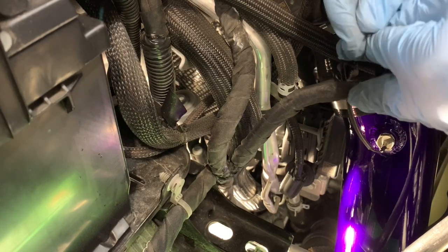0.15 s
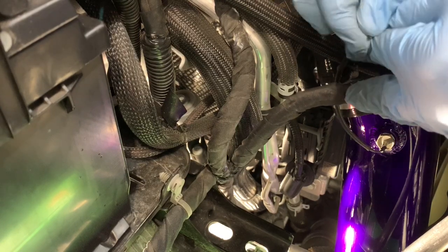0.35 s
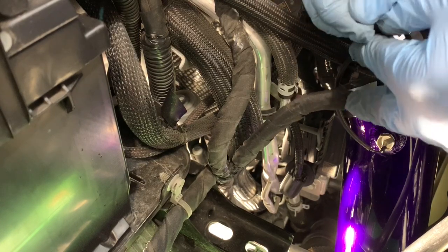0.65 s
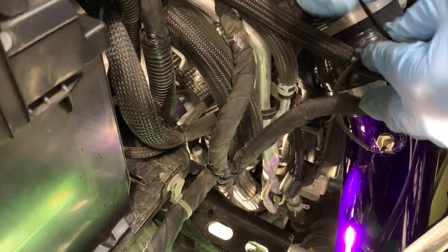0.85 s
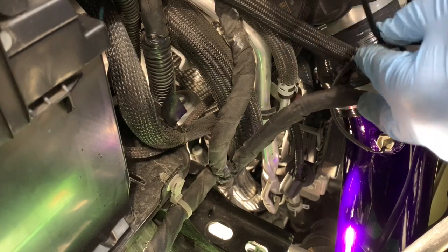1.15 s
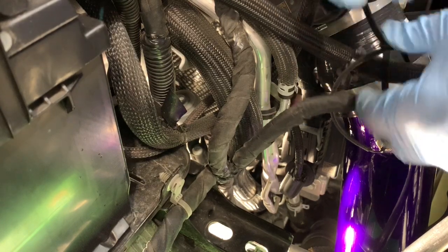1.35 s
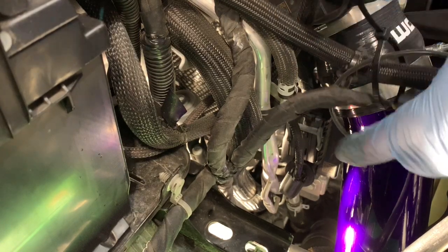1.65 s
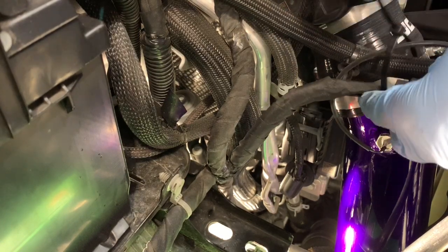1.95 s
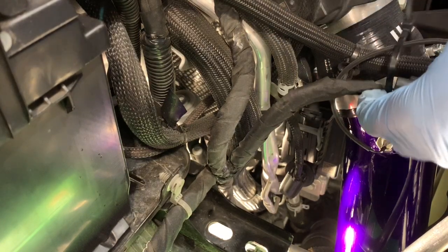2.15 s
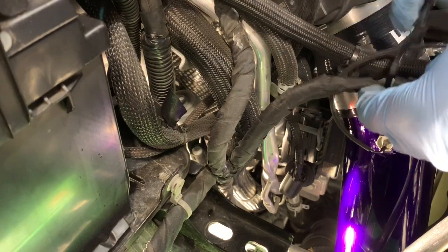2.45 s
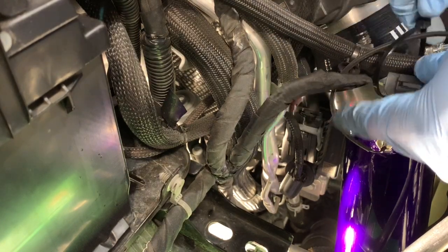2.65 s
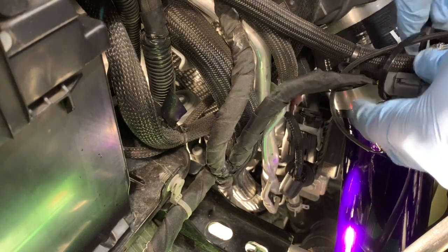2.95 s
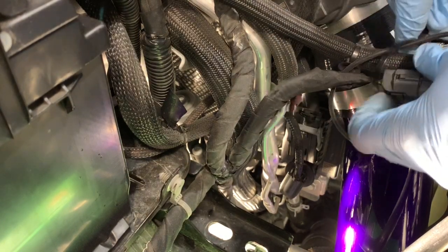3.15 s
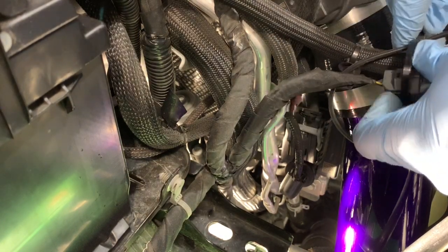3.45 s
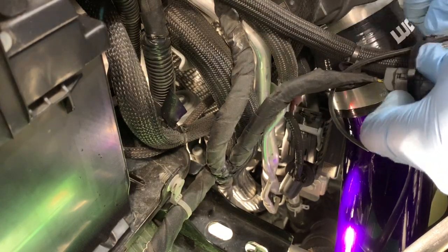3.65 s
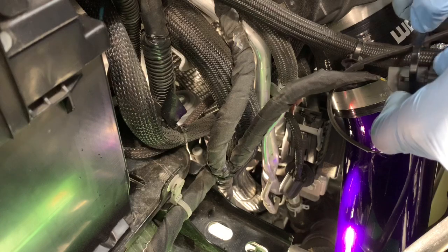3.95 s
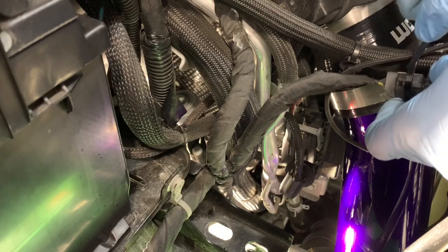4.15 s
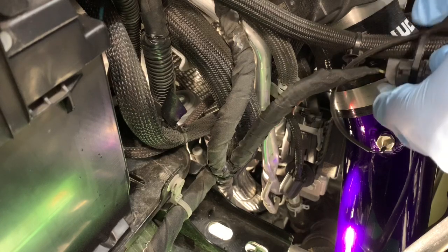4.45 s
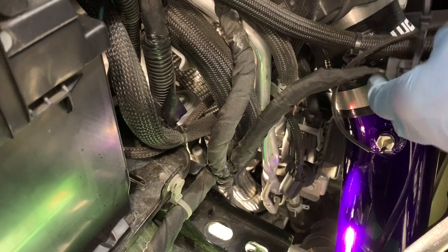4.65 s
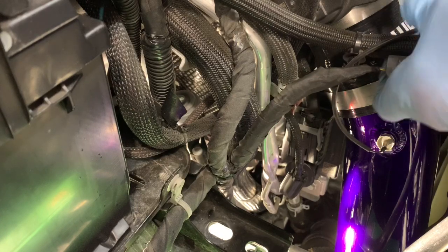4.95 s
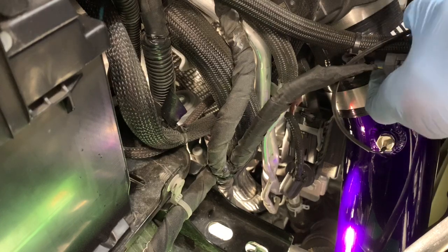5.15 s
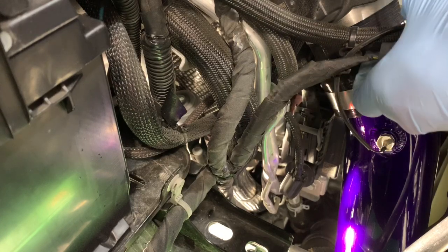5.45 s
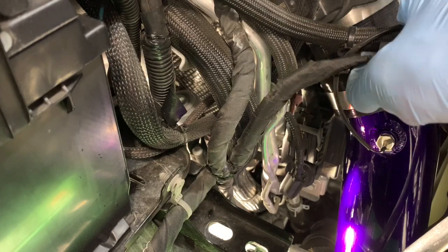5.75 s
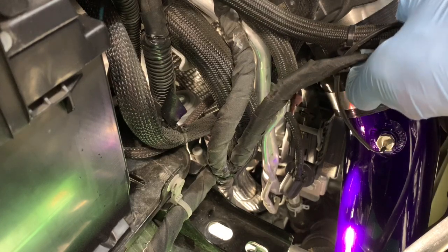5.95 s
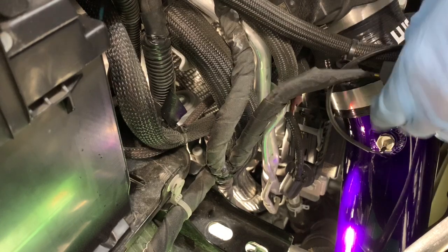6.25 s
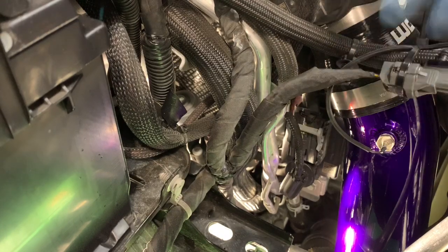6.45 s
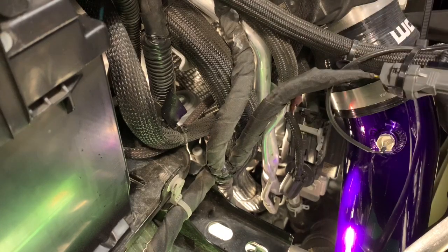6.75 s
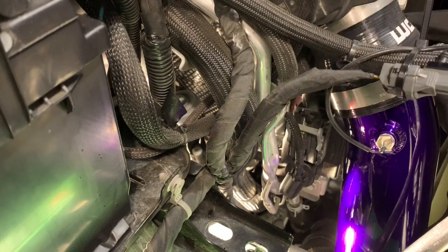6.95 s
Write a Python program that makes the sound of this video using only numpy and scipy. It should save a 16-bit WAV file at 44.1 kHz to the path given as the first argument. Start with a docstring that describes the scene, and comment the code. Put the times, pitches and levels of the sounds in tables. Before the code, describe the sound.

Gloved hands rub and tap around a wiring loom while a plastic tie zips tight in crisp bursts, a distant motor humming low.

```python
"""Cable tie in an engine bay

In a garage, a nylon cable tie is pulled tight round a wiring loom: each tooth snaps past the pawl as a
bouncing click that rings head, strap and loom and leaves a smeared echo. Gloved hands rustle on braid (noise),
tap plastic (short noise) and knock a hollow housing (decaying modes); a motor hums far off (sines and rumble).
Heard close by in stereo; the treble is nearly one sound on both sides, the left delayed and phase-shifted."""
import sys
import numpy as np
from scipy import signal
from scipy.fft import rfft, irfft
from scipy.io import wavfile

SR = 44100
rng = np.random.default_rng(int(sys.argv[2]) if len(sys.argv) > 2 else 0)


def unload_wav(signal):
    """Save mono or channel-first audio to the path in sys.argv[1] as 16-bit WAV at rate SR, clipped to [-1, 1]."""
    wavfile.write(
        sys.argv[1],
        SR,
        np.round(np.clip(np.atleast_2d(signal).T, -1, 1) * 32767).astype(np.int16),
    )


N = 313551   # samples, about 7.1 s

# Far motor, turning about 25 times a second. Each row: start in seconds, level in dB of multiples 2, 3, 4 and 5
# of the turning rate, level in dB of the rumble's 130-240 Hz part.
MOTOR_LEVELS = [(0.0, -58, -56, -58, -62, -65), (0.12, -70, -55, -52, -68, -64),
                (0.44, -54.5, -56.5, -52.5, -53.5, -58), (0.97, -54.5, -58, -54.5, -62.5, -68),
                (1.15, -65, -66, -69, -55.5, -67.5), (1.25, -53, -53.5, -61, -54, -66),
                (1.46, -81, -54.5, -51, -64, -64.5), (1.66, -58, -57, -49.5, -55, -56),
                (1.72, -59, -72, -57, -58, -65), (2.2, -52, -56, -51, -54, -63.5),
                (2.97, -61, -60, -72, -69, -64), (3.64, -57, -61, -52.5, -55, -67),
                (4.1, -55, -53, -53, -70, -62), (4.65, -53.5, -67, -58, -56, -64),
                (5.29, -54.5, -54, -54.5, -59.5, -66), (6.54, -54.5, -83, -48.5, -53.5, -59),
                (6.97, -53.5, -67, -47, -58.5, -58.5), (7.11, -80, -47, -47.5, -53, -67)]
# A second, slowly falling drone. Each row: time in seconds, level in dB.
DRONE_LEVELS = [(0, -87), (.42, -56), (.85, -61.5), (1.35, -66), (2.24, -60), (4.45, -73), (5.54, -61.5),
                (7.11, -86)]
# Spectrum of the far rumble. Each row: frequency in Hz, relative density in dB per Hz.
RUMBLE_SPECTRUM = [(30, -54), (39, -16.5), (47, -8), (60, 9), (68, -6), (113, 0.5), (188, -6.5),
                   (260, -16.5), (700, -51), (1500, -55.5), (4000, -89.5)]
# Spectrum of the still garage air. Each row: frequency in Hz, relative density in dB per Hz.
AIR_SPECTRUM = [(600, -20), (1200, 5), (2500, -2), (5000, -7), (8500, -11), (12000, -14), (15800, -16),
                (16300, -40)]
# How alike left and right are in the diffuse field. Each row: frequency in Hz, likeness from 0 to 1.
LIKENESS = [(40, 0.3), (70, 0.97), (130, 1), (290, 0.33), (640, 0.065), (1400, 0.44)]
# Loom and hoses shifting under the hands. Each row: time in seconds, level in dB before a 3 dB lift.
SHUFFLE_LEVELS = [(0, -70), (.2, -66), (.6, -65), (1.05, -67), (1.72, -69), (2.45, -66), (2.95, -72),
                  (3.65, -67), (3.96, -70), (4.2, -62), (4.6, -69), (4.93, -64), (5.47, -66), (5.92, -74),
                  (6.12, -66), (6.67, -65), (6.9, -69), (7.11, -73)]
# Spectrum of loom and hoses. Each row: frequency in Hz, relative density in dB per Hz.
HOSE_SPECTRUM = [(180, -7), (260, 0.6), (370, 2), (500, -2.5), (750, -5), (1000, -8), (1400, -28),
                 (4000, -50)]
# Strokes of glove and sleeve on braid. Each row: peak in seconds, swell in seconds, fade in seconds,
# bright hiss in dB, dull rub in dB, both before a 3 dB lift; swell and fade are at least 5 ms in use.
BRAID_STROKES = [(.136, 0.12, 0.11, -65.5, -69), (.35, 0.12, 0.14, -66.5, -62.5),
                 (.426, 0.076, .06, -71, -72), (.52, 0.17, 0.25, -66, -69),
                 (0.722, 0.0052, 0.7, -70, -61.5), (.895, 0.14, 0.058, -60.5, -85.5),
                 (1.169, 0.16, 0.036, -68, -79), (1.31, 0.33, 1, -59, -67.5),
                 (1.445, 0.006, 0.023, -44.5, -61), (1.587, 0.0077, 0.035, -55, -59),
                 (1.755, 0.024, 0.075, -63, -62), (1.898, 0.035, 0.061, -54.5, -61),
                 (2.07, 0.056, .03, -62.5, -63.5), (2.141, 0.08, 0.0047, -51.5, -62),
                 (2.18, 0.059, 0.076, -59, -61), (2.345, 0.028, 0.25, -52, -63),
                 (2.409, 0.016, 0.12, -53, -66), (2.44, 0.17, 0.11, -76, -61.5),
                 (2.52, 0.12, 0.092, -89, -67.5), (2.605, 0.28, 0.047, -57, -66),
                 (2.696, 0.24, 0.41, -71, -67.5), (2.994, 0.016, 0.12, -63.5, -71),
                 (3.078, 0.082, 0.051, -57.5, -67), (3.111, 0.03, 0.15, -64.5, -67),
                 (3.177, 0.014, 0.025, -50.5, -60.5), (3.353, .012, 0.19, -68.5, -74.5),
                 (3.496, 0.022, 0.45, -57, -75), (3.562, 0.066, 0.51, -84, -68.5),
                 (3.633, 0.03, 0.017, -48, -64), (3.94, 0.42, 0.15, -73.5, -68),
                 (4.053, 0.017, 0.46, -63.5, -62.5), (4.33, 0.062, 0.064, -60, -72),
                 (4.364, 0.054, 1, -72, -68.5), (4.643, 0.063, 0.075, -51.5, -59.5),
                 (4.756, 0.1, 0.043, -55.5, -64.5), (4.849, 0.11, 0.26, -61.5, -65.5),
                 (4.99, 0.15, 0.059, -63, -62), (5.108, 0.17, 0.16, -72, -61.5),
                 (5.258, 0.019, 0.19, -61, -55.5), (5.45, 0.17, 0.58, -74, -72),
                 (5.701, 0.12, 0.3, -78, -87.5), (5.87, .1, 0.12, -72.5, -86),
                 (6.098, 0.038, 0.19, -63, -62)]
# The hands slide off. Each row: the same columns as the strokes on braid.
LETTING_GO = [(6.16, .06, .35, -60, -61), (6.38, .18, .2, -64, -63)]
# Spectrum of bright hiss. Each row: frequency in Hz, relative density in dB per Hz.
HISS_SPECTRUM = [(3000, -21.5), (5500, -4), (7000, -7), (8800, -1.5), (11000, -2.5), (13000, -4),
                 (15700, -2.5), (16300, -35)]
# Spectrum of dull rubbing. Each row: frequency in Hz, relative density in dB per Hz.
RUB_SPECTRUM = [(500, -40.5), (1000, -5), (1600, -10.5), (2500, -5.5), (4000, -4.5), (5500, -8.5),
                (6800, -7), (9000, -44.5)]
# Knuckle knocks on a hollow housing. Each row: time in seconds, drive level in dB, hardness in dB per octave,
# share of the free ring time.
KNUCKLE_KNOCKS = [(.322, -41.5, 18, 0.14), (2.466, -44, 6, 0.99), (5.289, -40, -1, 0.85),
                  (5.3092, -36, 5, 0.72), (5.311, -31.5, 4.5, 1), (5.314, -40.5, 8, 1), (5.319, -39, 3, 1),
                  (6.0932, -41.5, 9, 0.21), (6.0972, -35, 2.5, 0.24), (6.102, -55, 9, 0.25)]
# Modes of the housing. Each row: frequency in Hz, level in dB before scatter, free 60 dB decay in seconds.
HOUSING_MODES = [(240, -0.5, 0.058), (374, -3, 0.052), (514, 3.5, 0.038), (806, 3.5, 0.014), (970, -5, .02),
                 (1252, -6, 0.056), (1730, -14.5, 0.017), (2070, -12, 0.012), (2590, -11, 0.008),
                 (3190, -13.5, 0.01), (3570, -16, 0.0045)]
# Fingers and strap tapping on plastic. Each row: time in seconds, bright part in dB and low part in dB before
# the gains of the two parts, 60 dB decay in seconds before its limits.
PLASTIC_TAPS = [(0.2926, -44, -68, 0.028), (0.3207, -31.5, -37.5, 0.052), (0.367, -57, -50.5, 0.038),
                (1.44, -44, -49, 0.0063), (2.18, -34, -70, 0.015), (2.408, -23.5, -56, 0.0086),
                (2.4655, -20.5, -68, 0.035), (6.0833, -39.5, -52, 0.015)]
# Teeth that snap one by one. Each row: time in seconds, drive level in dB before the resonances.
SINGLE_TEETH = [(0.7349, -8.5), (0.7487, -2.5), (0.7529, -6.5), (0.8656, -24), (0.8712, -14),
                (0.8797, -13.5), (1.1519, -11.5), (4.0554, -4.5), (4.0724, -5.5), (4.0949, -2.5),
                (4.1362, -3), (4.1652, -2.5), (4.1772, -1.5), (4.1886, -8.5), (4.1999, 0.5), (4.2112, -11),
                (4.2245, 0), (4.2326, -4.5), (4.2427, -6), (4.2528, -5), (4.261, -7), (4.2728, -5.5),
                (4.2842, -7), (4.3019, -6.5), (5.0982, -14.5), (5.3028, -14), (5.3347, -18), (5.3681, -19),
                (5.4204, -21), (5.456, -20), (5.4948, -20.5), (5.511, -37), (5.5474, -19), (5.664, -22.5),
                (5.753, -23), (5.8617, -22)]
# Even draws of the strap, one list each. Each row: time in seconds, teeth passed, drive level in dB.
EVEN_DRAWS = [
    [(.7822, 0, -9), (.7911, 4, -10), (.7987, 7, -12.5), (.814, 13, -11), (.8212, 16, -10), (.83, 20, -11),
     (.8387, 24, -10.5), (.8471, 28, -10), (.8539, 31, -11.5), (.8589, 33, -13), (.862, 34, -15)],
    [(.9628, 0, -11), (.9726, 1, -10.5), (.9833, 2, -10.5), (.991, 3, -10), (.9982, 4, -10.5),
     (1.0089, 6, -12), (1.0174, 8, -12.5), (1.0297, 10, -13.5), (1.0466, 13, -11.5), (1.0769, 18, -11.5),
     (1.0839, 19, -11.5), (1.1024, 21, -13), (1.1263, 23, -14)],
    [(5.2533, 0, -14), (5.2655, 2, -15), (5.2745, 4, -13), (5.2803, 5, -15.5), (5.2878, 6, -17)],
]
# The pawl lands and rebounds. Each row: delay in seconds, level in dB.
PAWL_BOUNCES = [(.0001, 0), (.0004, -8), (.001, -11)]
# Settings of the tie from each start on; a row may begin a new pull or change the colour partway through one.
# Each row: start in seconds, head in Hz, head in dB, pawl tip in dB, shank in dB, # strap in Hz, strap width in
# Hz, strap in dB, loose end in Hz, loose end in dB, loom in dB, # loom tilt in dB per octave. Levels are before
# the scatter from tooth to tooth.
STRAP_PULLS = [(0.699, 14900, 17.5, 5.5, 2, 7370, 1820, 9.5, 3465, -17, -26, -1),
               (0.931, 14300, 12.5, 14.5, 6.5, 7760, 1290, 10, 4140, -42, -21.5, 5),
               (4.0, 14830, 9.5, 4.5, 13, 9140, 1440, 6.5, 6010, -9.5, -22, 3.5),
               (4.247, 15100, 8.5, 6, 15.5, 9300, 1440, 2.5, 2060, -16, -20.5, 0),
               (5.048, 14600, 17.5, 9, -3, 9000, 1500, 9, 6630, 3, -16.5, 1),
               (5.331, 14600, 7.5, 12, 2, 8660, 1450, 22.5, 6590, 6, -15, 2.5)]
# Resonances of the loom under the tie. Each row: frequency in Hz, width in Hz, relative level in dB.
LOOM_MODES = [(5100, 330, 8), (3710, 740, 8.5), (2590, 160, 14), (1850, 250, 8.5), (1310, 300, 9.5),
              (800, 890, 2.5), (6020, 1500, 2.5), (3240, 250, 4), (4450, 570, 2)]

MOTOR_HZ, RUMBLE_LIFT_DB, AIR_DB = 24.71, 10.5, -79   # the lift: whole rumble over its 130-240 Hz part
DRONE_HZ, DRONE_SAG_HZ_PER_S = 196, 2.6
STROKE_RANGE_DB = 20   # level lost over one swell or fade time
# narrow bands added to the rub, whose levels drift by chance
PATCH_WIDTH_HZ, PATCH_DB, PATCH_SWING_DB, PATCH_RATE_HZ = 200, 1, 5, 4
KNOCK_RIGHT_LOSS_DB, MODE_SCATTER_DB = 6, 1.5
TOOTH_JITTER_S, TOOTH_SCATTER_DB = .00006, .8
HEAD_WIDTH_HZ, SHANK_HZ, SHANK_WIDTH_HZ = 2360, 13100, 1900
TIP_HZ, TIP_WIDTH_HZ, LOOSE_WIDTH_HZ = 15600, 260, 550
SEAT_LOOM_DB, SEAT_STRAP_DB = 3, .8   # each tooth seats its own way: scatter of the resonances
ECHO_LENGTH = 4000   # samples
ECHO_DB, ECHO_T60_S, TAIL_DB, TAIL_T60_S = -28, .038, -16, .06   # the tail is relative to the echo
NEAR_WALL_S, FAR_WALL_S, FAR_WALL_LIFT = .001, .0033, .4
LAST_WALL_S, OPEN_LOSS_DB = .0045, -7   # past the last near surface the echo drops
FRESH = .3   # share of the echo that is new each time
LOOM_SNAP, LOOM_SMEAR = 1.4, 4.22   # how much the loom takes of the snap and of its echo
LOOM_LAG = 9   # samples by which the left side hears the snap in the loom later
CAPSULE_HZ, CUTOFF_HZ = 15780, 17119   # the microphone falls off above the first, the top is cut at the second
SHARED_TREBLE_HZ, LEFT_LAG = 6400, 9   # lag in samples


def from_db(db):
    """Decibels to an amplitude factor."""
    return 10 ** (np.asarray(db) / 20)


def rms_one(x):
    """Scale to an rms of 1."""
    return x / np.sqrt(np.mean(x ** 2) + 1e-20)


def in_time(rows):
    """Straight lines between timed rows, one curve a column."""
    s, *columns = np.transpose(rows)
    return [np.interp(np.arange(N) / SR, s, column) for column in columns]


def at_hz(points, hz):
    """Read a curve over log frequency."""
    points_hz, values = np.transpose(points)
    return np.interp(np.log(hz + 1), np.log(points_hz), values)


def drift(rate_hz):
    """Slow chance around zero, spread 1: noise through two equal low-passes, run at every 40th sample."""
    r = np.exp(-80 * np.pi * rate_hz / SR)
    noise = rng.standard_normal(N // 40 + 2002)
    slow = signal.lfilter([1], [1, -2 * r, r * r], noise)[2000:]   # settled part
    return np.interp(np.arange(N) / 40, np.arange(len(slow)), rms_one(slow))


def coloured(x, spectrum):
    """Two channels shaped by a spectrum and blended to the likeness of a diffuse field; rms 1."""
    hz = np.arange(N // 2 + 1) * SR / N
    mid, side = rfft(x) * from_db(at_hz(spectrum, hz))
    alike = np.clip(at_hz(LIKENESS, hz), 0, 1)
    pair = np.sqrt(1 + alike) * mid + np.sqrt(1 - alike) * side * [[1], [-1]]
    return rms_one(irfft(pair, N))


def resonate(x, modes):
    """Parallel resonances of (Hz, width in Hz, dB), signs alternating."""
    out = 0
    for k, (hz, width, level_db) in enumerate(modes):
        r = np.exp(-np.pi * width / SR)
        b = [(1 - r * r) / 2, 0, (r * r - 1) / 2]
        a = [1, -2 * r * np.cos(2 * np.pi * hz / SR), r * r]
        out = out + (-1) ** k * from_db(level_db) * signal.lfilter(b, a, x)
    return out


def boost(x, hz, width, level_db, strength):
    """Lifts a band by a resonance added to the sound, leaves the rest."""
    return x + (from_db(level_db) - 1) * resonate(strength * x, [(hz, width, 0)])


def spikes(s, level_db):
    """One-sample impulses at the given seconds."""
    out = np.full(N, 1e-12)
    np.add.at(out, (np.asarray(s) * SR).astype(int), from_db(level_db))
    return out


def garage(waver_db):
    """Far off: motor multiples that waver, a falling drone, rumble and still air."""
    t = np.arange(N) / SR
    *lines_db, rumble_db = in_time(MOTOR_LEVELS)
    drone_db, = in_time(DRONE_LEVELS)
    drone_hz = DRONE_HZ - DRONE_SAG_HZ_PER_S * t + 0.88 * drift(1.5)
    hum = from_db(drone_db) * np.sin(2 * np.pi * np.cumsum(drone_hz) / SR)
    turn = 2 * np.pi * MOTOR_HZ * t
    for multiple, line_db in enumerate(lines_db, start=2):
        level = from_db(line_db + waver_db * drift(4.1))
        phase = 2 * np.pi * rng.random() + 0.32 * drift(2.0)
        hum += level * np.sin(multiple * turn + phase)
    hum = np.sqrt(2) * hum * from_db([[.6], [-.6]])   # a little louder on the left
    rumble = from_db(rumble_db + RUMBLE_LIFT_DB) * coloured(rng.standard_normal((2, N)), RUMBLE_SPECTRUM)
    air = from_db(AIR_DB) * coloured(rng.standard_normal((2, N)), AIR_SPECTRUM)
    return hum + rumble + air


def strokes():
    """Each stroke swells to its peak and fades at steady dB rates; overlapping strokes add in power."""
    t, power = np.arange(0, N, 64) / SR, 1e-12
    for s, swell_s, fade_s, *levels_db in BRAID_STROKES + LETTING_GO:
        away = np.where(t < s, (s - t) / max(swell_s, .005), (t - s) / max(fade_s, .005))
        power = power + from_db(np.array(levels_db)[:, None] - STROKE_RANGE_DB * away) ** 2
    return [np.interp(np.arange(N) / SR, t, 10 * np.log10(p)) for p in power]


def patchy(x):
    """Patchy rub: narrow noise bands over about two octaves, whose levels drift by chance."""
    patched = x
    for hz in np.geomspace(1300, 6500, 9) * rng.uniform(.93, 1.07, 9):
        level_db = PATCH_DB + PATCH_SWING_DB * np.clip(drift(PATCH_RATE_HZ), -3, 2)
        patched = patched + from_db(level_db) * resonate(x, [(hz, PATCH_WIDTH_HZ, 0)])
    return rms_one(patched)


def rustle(grain_db, flutter_db):
    """Rubber dragged over weave: noise of uneven grains whose level flutters with the grip."""
    hiss_db, rub_db = strokes()
    shuffle_db, = in_time(SHUFFLE_LEVELS)
    grains = rng.standard_normal((3, 2, N)) * from_db(grain_db * rng.standard_normal((3, 2, N)))
    flutter = flutter_db * drift(29)
    hiss = from_db(hiss_db + flutter) * coloured(grains[0], HISS_SPECTRUM)
    rub = from_db(rub_db + flutter + 1.2 * drift(2.8)) * patchy(coloured(grains[1], RUB_SPECTRUM))
    shuffle = from_db(shuffle_db + 2.5 * drift(10)) * coloured(grains[2], HOSE_SPECTRUM)
    return np.sqrt(2) * (hiss + rub + shuffle)


def knocks(scuff_db, scuff_s):
    """A blow with a short scuff rings the housing, each its own way; weaker and struck a little later at right."""
    length = 6000   # samples
    out = np.zeros((2, N))
    scatter = rng.standard_normal((len(KNUCKLE_KNOCKS), len(HOUSING_MODES)))
    for (s, level_db, hard_db, share), chance in zip(KNUCKLE_KNOCKS, scatter):
        start = int(s * SR)
        scuff = from_db(scuff_db - 60 * np.arange(length) / (scuff_s * share * SR))
        blow = scuff * rng.standard_normal((2, length))
        blow[0, 0], blow[1, 17] = 1, 1   # the impact itself
        blow[1] *= from_db(-KNOCK_RIGHT_LOSS_DB)
        for k, (hz, mode_db, t60) in enumerate(HOUSING_MODES):
            r = from_db(-60 / (t60 * max(share, .1) * SR))
            w = 2 * np.pi * hz / SR
            tilt_db = hard_db * np.log2(hz / HOUSING_MODES[2][0])
            gain = from_db(level_db + mode_db + tilt_db + MODE_SCATTER_DB * chance[k])
            ring = signal.lfilter([0, np.sin(w)], [1, -2 * r * np.cos(w), r * r], blow)
            out[:, start:start + length] += (-1) ** k * gain * ring
    return out


def taps():
    """Short contacts: noise with a bright and a low part that decay together."""
    bright, low = np.zeros(N), np.zeros(N)
    for s, level_db, low_db, t60 in PLASTIC_TAPS:
        at = int(s * SR)
        shape = from_db(-60 * np.arange(4000) / (np.clip(t60, .004, .09) * SR))
        bright[at:at + 4000] += from_db(level_db) * shape
        low[at:at + 4000] += from_db(low_db) * shape
    bright_noise = coloured(rng.standard_normal((2, N)), HISS_SPECTRUM)
    low_noise = coloured(rng.standard_normal((2, N)), RUB_SPECTRUM)
    return 0.41 * bright * bright_noise + 1.2 * low * low_noise


def drawn_teeth(draw):
    """One snap at every whole tooth of travel, with a little scatter in time and level."""
    s, passed, level_db = np.transpose(draw)
    k = np.arange(passed[-1] + 1)
    snap_s = np.interp(k, passed, s) + TOOTH_JITTER_S * rng.standard_normal(len(k))
    snap_db = np.interp(k, passed, level_db) + TOOTH_SCATTER_DB * rng.standard_normal(len(k))
    return np.column_stack([snap_s, snap_db])


def bay_echo(teeth):
    """Decaying noise behind each snap, stepped by near surfaces; partly alike from tooth to tooth."""
    t = np.arange(ECHO_LENGTH) / SR
    early = from_db(-60 * t / ECHO_T60_S + OPEN_LOSS_DB * (t > LAST_WALL_S))
    early = early * (1 + (t > FAR_WALL_S) * FAR_WALL_LIFT)
    tail = from_db(TAIL_DB - 60 * t / TAIL_T60_S)
    echo = from_db(ECHO_DB) * ((early + tail) * (t > NEAR_WALL_S))[None]
    alike = signal.fftconvolve(teeth, echo * rng.standard_normal((2, ECHO_LENGTH)))
    fresh = signal.fftconvolve(teeth, echo) * rng.standard_normal(alike.shape)
    return (np.sqrt(1 - FRESH) * alike + np.sqrt(FRESH) * fresh)[:, :teeth.shape[1]]


def ratchet(click_db):
    """Pawl clicks that bounce and echo drive the tie's head and strap, and the loom and loose end."""
    s, level_db = np.vstack([SINGLE_TEETH, *map(drawn_teeth, EVEN_DRAWS)]).T
    out = np.zeros((2, N))
    ends = [pull[0] for pull in STRAP_PULLS[1:]] + [N / SR]
    for pull, end in zip(STRAP_PULLS, ends):
        start, head_hz, head_db, tip_db, shank_db, strap_hz, strap_width, strap_db = pull[:8]
        loose_hz, loose_db, loom_db, tilt_db = pull[8:]
        mine = (s >= start) & (s < end)
        span = slice(int(start * SR), int((start + .7) * SR))
        teeth = spikes(s[mine], level_db[mine] + click_db)[None, span]
        clicks = sum(from_db(bounce_db) * np.roll(teeth, round(lag * SR)) for lag, bounce_db in PAWL_BOUNCES)
        smear = bay_echo(teeth)

        # the seating holds from one tooth to the next, and changes just ahead of the snap
        now = start + np.arange(teeth.shape[1]) / SR + .0003
        latest = np.searchsorted(np.sort(s[mine]), now)
        seat = rng.standard_normal((mine.sum() + 1, len(LOOM_MODES) + 5))[latest].T
        firm = from_db(SEAT_STRAP_DB * seat[-4:])

        ring = signal.lfilter([1, -1], [2], clicks + smear)   # a small body radiates better the higher the pitch
        ring = boost(ring, head_hz, HEAD_WIDTH_HZ, head_db, firm[0])
        ring = boost(ring, SHANK_HZ, SHANK_WIDTH_HZ, shank_db, firm[1])
        ring = boost(ring, strap_hz, strap_width, strap_db, firm[2])
        ring = boost(ring, TIP_HZ, TIP_WIDTH_HZ, tip_db, firm[3])
        above_strap = signal.butter(6, 0.84 * strap_hz, "high", fs=SR, output="sos")
        out[:, span] += signal.sosfilt(above_strap, ring)   # cuts away what lies below the strap

        body = []
        for hz, width, mode_db in LOOM_MODES:
            body.append((hz, width, loom_db + mode_db + tilt_db * np.log2(hz / LOOM_MODES[1][0])))
        body.append((loose_hz, LOOSE_WIDTH_HZ, loose_db))
        shake = LOOM_SNAP * np.vstack([np.roll(teeth, LOOM_LAG), teeth]) + LOOM_SMEAR * smear
        for k, mode in enumerate(body):
            out[:, span] += (-1) ** k * resonate(from_db(SEAT_LOOM_DB * seat[k]) * shake, [mode])
    return out


def scene():
    """The far garage, the hands on the loom, then the tie itself close by."""
    background = garage(waver_db=0.5)
    hands = rustle(grain_db=4, flutter_db=2.0) + knocks(scuff_db=-26, scuff_s=.035) + taps()
    return background + hands + ratchet(click_db=0.0)


def record(dry):
    """The treble is nearly one sound on both sides, the left later and a quarter cycle on; the top is cut."""
    hz = np.arange(N // 2 + 1) * SR / N
    capsule = signal.butter(9, CAPSULE_HZ, fs=SR, output="sos")
    left, right = rfft(signal.sosfilt(capsule, dry))
    share = .95 * np.clip((hz - SHARED_TREBLE_HZ) / 1600, 0, 1)
    shifted = right * 1j * np.exp(-2j * np.pi * hz * LEFT_LAG / SR)
    left = np.sqrt(1 - share) * left + np.sqrt(share) * shifted
    top_cut = signal.cheby2(16, 55, CUTOFF_HZ, fs=SR, output="sos")
    return signal.sosfilt(top_cut, irfft(np.array([left, right]), N))


dry = scene()
out = record(dry)
unload_wav(out)
```